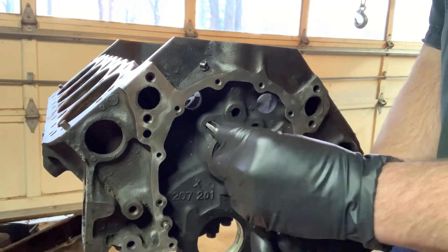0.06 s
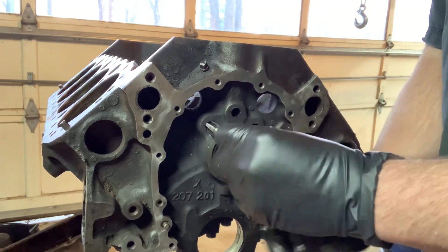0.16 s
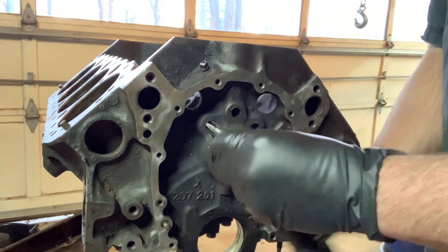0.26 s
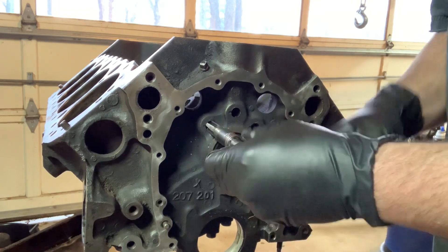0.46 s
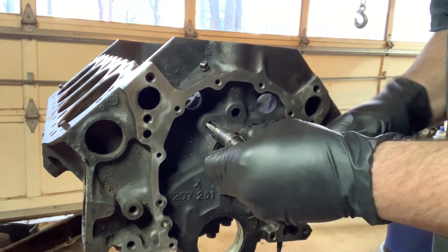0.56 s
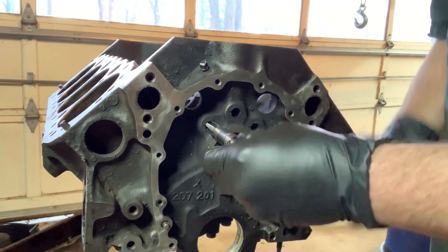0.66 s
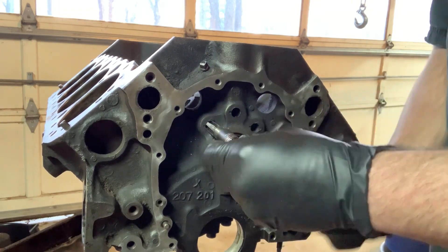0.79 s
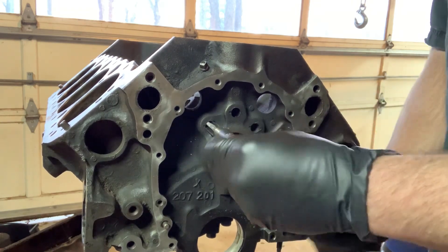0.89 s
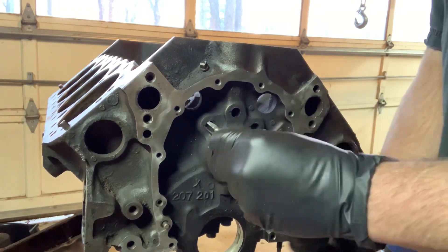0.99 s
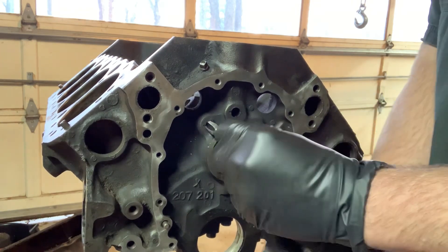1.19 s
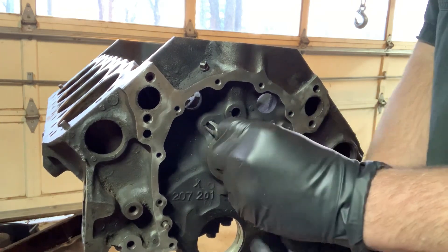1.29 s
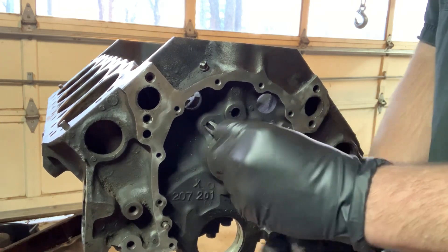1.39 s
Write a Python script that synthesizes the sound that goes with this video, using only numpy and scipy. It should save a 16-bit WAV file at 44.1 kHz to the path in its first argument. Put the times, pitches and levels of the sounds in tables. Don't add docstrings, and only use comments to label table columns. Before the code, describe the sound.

Fast bright metallic ratchet clicking, about fourteen teeth, then faint handling knocks in a quiet workshop

```python
import sys
import numpy as np
from scipy import signal
from scipy.fft import rfft, irfft, next_fast_len
from scipy.io import wavfile

SR = 44100
rng = np.random.default_rng(int(sys.argv[2]) if len(sys.argv) > 2 else 0)


def attenuation_scalar(level_db):
    decades = np.asarray(level_db, float) / 20
    return 10 ** decades


def output_pcm(signal):
    pcm = np.clip(np.atleast_2d(signal).T, -1, 1) * 32767
    wavfile.write(sys.argv[1], SR, np.round(pcm).astype(np.int16))


N = 63945

# (time [s], crack level [dB], thud level [dB], low bar mode level [dB], high bar mode level [dB])
PAWL_DROPS = [(0.23, -30.5, -42.5, -40.5, -36), (0.2534, -30.5, -46.5, -45, -36.5),
              (0.2723, -30, -39, -47, -34), (0.2897, -30.5, -39, -48, -30.5),
              (0.3062, -32, -50.5, -48, -51.5), (0.322, -28.5, -46, -52, -42),
              (0.3383, -29.5, -47.5, -46, -41.5), (0.3546, -25.5, -49.5, -52, -50),
              (0.374, -29.5, -42, -54.5, -34), (.3930, -29.5, -49, -48.5, -39),
              (0.4122, -27, -43, -46.5, -36), (0.4308, -27, -39.5, -44.5, -31.5),
              (0.458, -29.5, -40.5, -45.5, -50), (0.4967, -29, -40, -48, -44.5)]
DROP_THUD_HZ = [1600, 1720, 1650, 1780, 2200, 2260, 2000, 1780, 2050, 1990, 1360, 2870, 1920, 3000]
# (rise [s], ring length [share of usual], beat phase [rad], thud spacing [s])
DROP_RING = [(0.0031, 0.31, 1.1, .0013), (.001, 0.56, 0.084, 0.0012), (.001, 1.3, 1, .0012),
             (0.0015, 1, 0, .0013), (0.00048, 1., 1.5, 0.0019), (.001, 0.49, 0.17, .001),
             (.001, .8, 1.8, 0.0017), (.001, 1.1, 2.3, 0.0015), (.001, 0.7, 0.23, .001),
             (.002, 1., 0.26, 0.0011), (.002, 0.64, 0, .001), (0.0022, 0.58, 1.2, 0.00074),
             (0.00071, 0.53, 2.5, 0.0019), (0.0015, 0.56, 2., .0013)]
# (frequency [Hz], level [dB per Hz])
CRACK_COLOUR = [(700, -29), (1500, -13.5), (3000, -6), (6000, -7.5), (8000, 3.5), (10500, 0), (13000, -9.5),
                (16000, -18)]
# (frequency [Hz], level [dB], T60 [s])
HEAD_MODES = [(1387, -5.5, 0.018), (1647, -1.5, 0.011), (2200, 5.5, 0.0096), (2700, -0.5, 0.012),
              (3100, 1.5, 0.016), (3460, -1, 0.016), (6000, 0.5, 0.0061)]
# (frequency [Hz], level [dB], T60 [s])
LOW_BAR_MODES = [(4538, -12.5, .06), (4584, 2.5, 0.12), (4740, -14, 0.062), (4540, -6.5, 0.18)]
# (frequency [Hz], level [dB], T60 [s])
HIGH_BAR_MODES = [(9358, -10, 0.058), (9453, 4.5, 0.047), (9443, -9.5, 0.16), (9415, -13.5, .04),
                  (10500, -13, .02), (9870, -7.5, .02), (7500, -33, .05)]
# (frequency [Hz], level [dB], T60 [s])
TOP_BAR_MODES = [(15380, -17, .03), (15140, -22, .03)]
# (time [s], level [dB], centre [Hz], top [Hz], room send [dB])
KNOCKS = [(0.03, -66.5, 1310, 6240, 3), (.182, -59.5, 1001, 2500, 5.5), (0.195, -47.5, 2400, 6160, 1),
          (.415, -56.5, 920, 1520, -12), (.425, -60, 221, 356, 1.5), (.76, -72.5, 333, 600, 9.5),
          (0.759, -58, 1800, 4880, 6.5), (0.599, -72.5, 1500, 3000, 4), (.855, -70.5, 1800, 3520, -0.5),
          (0.949, -60, 1790, 4450, 5.5), (0.953, -70, 302, 870, 10), (1.003, -67, 1190, 2500, -6),
          (1.3247, -53, 1224, 2510, 11), (1.329, -54.5, 2200, 3350, 9), (1.335, -64, 255, 503, 4),
          (.235, -69, 260, 350, 6), (1.387, -63.5, 200, 350, 2)]
# (frequency [Hz], level [dB], T60 [s])
BLOCK_MODES = [(252, -22.5, 0.24), (643, 2, 0.044), (794.2, -4.5, 0.26), (910, -4.5, 0.2), (920, -1, 0.27),
               (1046, 0.5, 0.15), (1142, 4, 0.045), (1406, 0, 0.055), (1910, -6.5, 0.13)]
# (time
# [s], level [dB], frequency [Hz], T60 [s], rise [s])
RINGING_TONES = [(.045, -63.5, 449, 0.077, 0.0062), (.272, -47, 1720, 0.022, 0.00087),
                 (0.43, -37, 2650, .03, 0.00058), (0.429, -46, 3100, 0.034, .0007),
                 (.4965, -43, 3280, 0.032, 0.00061), (.4965, -42.5, 2218, .05, 0.00052),
                 (.50, -60.5, 2265, 0.28, .005), (.505, -71, 3510, 0.29, .005), (0.508, -72, 2720, 0.43, .01),
                 (.52, -71, 1954, 0.44, 0.011), (.688, -70, 279.5, 0.057, 0.0037),
                 (.778, -66.5, 216, .12, 0.0051), (.952, -63, 209.4, 0.086, .004),
                 (.615, -72.5, 800, 0.33, .01), (0.761, -63, 1048, .15, .003), (.762, -70, 2300, .08, 0.0012),
                 (.78, -74, 2540, 0.094, .004), (.832, -68.5, 793, .25, 0.0071),
                 (.62, -76.5, 1230, 0.28, .01), (0.948, -68, 1050, 0.14, 0.0022),
                 (.948, -61, 1752, 0.043, 0.0019), (0.954, -75, 481, 0.22, .004),
                 (.962, -64.5, 803, 0.29, 0.0071), (1.0, -73, 795, 0.24, .008),
                 (1.002, -67.5, 1196, 0.14, 0.0031), (1.006, -72, 433, 0.09, 0.0031),
                 (1.3251, -38.5, 1173, .011, 0.00069), (1.33, -52.5, 630, 0.12, .003),
                 (1.354, -57, 1124, 0.17, 0.0058), (1.4244, -54.5, 1500, 0.018, 0.00061),
                 (1.4248, -60.5, 4600, .012, 0.00048), (1.425, -51.5, 2243, 0.018, 0.00073)]
# (time [s], level [dB], frequency [Hz], T60 [s])
TICKS = [
    (0.138, -64, 1850, 0.011),
    (0.674, -68.5, 10900, 0.0061),
    (0.6893, -56, 1600, 0.019),
    (1.114, -76.5, 1443, 0.017),
    (1.249, -62, 4300, 0.0089),
    (1.423, -54, 2690, 0.011),
    (1.446, -61.5, 4730, 0.06),
]
# (start [s], length [s], level [dB])
GLOVE_RUBS = [
    (0.0, 0.066, -67.5),
    (0.169, 0.38, -55),
    (0.572, 0.063, -68),
    (0.647, 0.081, -74.5),
    (1.195, 0.08, -73),
    (1.287, 0.082, -74),
    (1.385, 0.09, -68),
]
# (frequency [Hz], level [dB per Hz])
GLOVE_COLOUR = [(300, -10), (800, -9), (1400, -1), (3000, -3.5), (6000, -12), (12000, -24)]
# (frequency [Hz], T60 [s])
ROOM_T60 = [(200, 0.34), (1000, 0.4), (3000, 0.23), (8000, 0.26), (12000, 0.19), (15500, 0.071)]
# (frequency [Hz], level [dB per Hz])
FLOOR_COLOUR = [(30, -13), (60, 3.5), (120, 0.5), (170, -5.5), (500, -20), (2000, -26.5), (6000, -30),
                (14200, -31), (14800, -55.5)]
# (frequency [Hz], level [dB])
HUM_LINES = [(60, -79), (92, -76.5), (118, -73.5), (240, -88)]
# (frequency [Hz], left-right phase [rad])
PORT_TURN = [(100, .05), (1000, .6), (4600, 1.5), (7500, 3.0), (8900, 3.3), (11300, 6.0), (14400, 6.5),
             (15400, 8.4)]
# (frequency [Hz], level [dB])
APART = [(60, -3), (300, -4.5), (700, 3), (2500, 0), (4600, 0), (6300, -1), (7300, -5.5), (7800, -24.5),
         (10000, -10), (15000, -22)]
# (frequency [Hz], left over right [dB])
LEFT_RIGHT = [(60, -3), (180, -5), (550, 1), (1650, 0.5), (4970, 0), (15000, 2.5)]


def at_hz(points, hz):
    curve_hz, value = np.array(points).T
    return np.interp(np.log(hz + 1), np.log(curve_hz), value)


def rms_one(x):
    return x / np.sqrt(np.mean(x ** 2) + 1e-20)


def sos_filter(x, order, hz, kind="low"):
    return signal.sosfilt(signal.butter(order, hz, kind, fs=SR, output="sos"), x)


def colour(x, spectrum):
    size = x.shape[-1]
    return irfft(rfft(x) * attenuation_scalar(at_hz(spectrum, np.fft.rfftfreq(size, 1 / SR))), size)


def clicks(s, gain):
    out = np.full(N, 1e-18)
    places = np.clip((np.asarray(s) * SR).astype(int), 0, N - 1)
    np.add.at(out, places, gain)
    return out


def ring(x, hz, t60):
    r, w = attenuation_scalar(-60 / (t60 * SR)), 2 * np.pi * hz / SR
    return signal.lfilter([0, np.sin(w)], [1, -2 * r * np.cos(w), r * r], x)


def decay(x, t60):
    return signal.lfilter([1], [1, -attenuation_scalar(-60 / (t60 * SR))], x)


def ratchet():
    bounce_s, bounce_loss_db, thud_loss_db, spread_db = 0.0011, 3.5, 6, 1.5
    crack_t60_s, crack_db, thud_db = 0.0059, 4, 0.5
    octave_loss_db = 18.0
    s, crack, thud = np.transpose(PAWL_DROPS)[:3, :, None]
    k = np.arange(4)
    shape = (len(s), 4)

    when = s + bounce_s * k * rng.uniform(0.43, 1.4, shape)
    uneven = spread_db * rng.standard_normal(shape)
    size = attenuation_scalar(crack + crack_db - bounce_loss_db * k + uneven)
    out = decay(clicks(when.ravel(), size.ravel()), crack_t60_s)
    out = colour(out * rng.choice([-1, 1], N), CRACK_COLOUR)

    later = (s + 0.0006 + np.array(DROP_RING)[:, 3:] * k).ravel()
    for hz, mode_db, t60 in HEAD_MODES:
        away = octave_loss_db * np.abs(np.log2(hz / np.array(DROP_THUD_HZ)))[:, None]
        uneven = spread_db * rng.standard_normal(shape)
        size = attenuation_scalar(thud + thud_db + mode_db - away - thud_loss_db * k + uneven)
        out += ring(clicks(later, size.ravel()), hz, t60)
    return sos_filter(out, 4, 1200, "high")


def bar():
    bar_db, high_bar_db = 8, -2
    flutter_db, flutter_hz = 2.5, 89.4
    swing_rad = 0.63
    s, crack, _, low, high = np.transpose(PAWL_DROPS)
    rise, length, beat, _ = np.transpose(DROP_RING)
    t, out = np.arange(N) / SR, 0
    last = np.clip(np.searchsorted(s, t) - 1, 0, None)
    since = np.maximum(t - s[last], 0)
    attack = 1 - np.exp(-since / rise[last])
    swing = (swing_rad * rng.uniform(-1.2, 1, len(s)) * [[1], [-1]])[:, last]
    groups = (
        (LOW_BAR_MODES, low, swing, beat[last]),
        (HIGH_BAR_MODES, high + high_bar_db, 0, 0),
        (TOP_BAR_MODES, crack, 0, 0),
    )
    for modes, db, turn, offset in groups:
        flutter = flutter_db * rms_one(sos_filter(rng.standard_normal(N), 2, flutter_hz))
        for k, (hz, mode_db, t60) in enumerate(modes):
            fall = 60 * since / (t60 * length[last])
            level = db[last] + bar_db + mode_db - fall + flutter
            out = out + attenuation_scalar(level) * attack * np.sin(2 * np.pi * hz * since + turn + k * offset)
    return sos_filter(out, 2, 3000, "high")


def knocks():
    half_width_octaves, block_db = 0.91, -10
    direct, send = np.zeros(N), np.zeros(N)
    for s, db, hz, top_hz, room_db in KNOCKS:
        edges = hz * 2 ** (half_width_octaves * np.array([-1., 1.]))
        burst = sos_filter(clicks([s], 0.88), 2, edges, "band")
        burst = sos_filter(burst, 3, top_hz)
        burst *= attenuation_scalar(db) / np.abs(burst).max()
        direct += burst
        send += burst * attenuation_scalar(room_db + 15)
    body = 0
    for hz, db, t60 in BLOCK_MODES:
        body = body + attenuation_scalar(block_db + db) * hz / SR * 3.8 * ring(direct, hz, t60)
    return direct + body, send + body


def ringing_tones():
    t, out = np.arange(N) / SR, 0
    for s, db, hz, t60, rise in RINGING_TONES:
        since = np.maximum(t - s, 0)
        pair = np.sin(2 * np.pi * hz * since) + 0.4 * np.sin(2 * np.pi * hz * 1.035 * since)
        out = out + attenuation_scalar(db - 60 * since / t60) * (1 - np.exp(-since / rise)) * pair
    return out


def ticks():
    out = 0
    for s, db, hz, t60 in TICKS:
        tap = clicks([s], 1.)
        pair = ring(tap, hz, t60) + 0.7 * ring(tap, hz * 1.17, t60)
        out = out + attenuation_scalar(db) * sos_filter(pair, 2, [hz / 1.3, hz * 1.5], "band")
    return out


def glove():
    t, stroke = np.arange(N) / SR, 0
    for s, length, db in GLOVE_RUBS:
        stroke = stroke + attenuation_scalar(db) * np.sin(np.pi * np.clip((t - s) / length, 0, 1))
    grains = rng.standard_normal((2, N)) * attenuation_scalar(1.1 * np.minimum(rng.exponential(1, N), 5))
    return stroke * rms_one(colour(grains, GLOVE_COLOUR))


def scatter(x):
    level_db, t60 = -1, 0.036
    t = np.arange(SR // 20) / SR
    cloud = rng.standard_normal((2, len(t))) * attenuation_scalar(-60 * t / t60) * np.sqrt(14 / t60 / SR)
    return attenuation_scalar(level_db) * signal.fftconvolve(x[None], cloud, axes=1)[:, :N]


def room(x):
    level_db, delay_s, build_s = -8.5, 0.0028, 0.0026
    t, tail = np.arange(SR // 2) / SR, 0
    for hz in 180 * 2. ** np.arange(0, 7, .5):
        edges = [hz / 1.19, min(hz * 1.19, .48 * SR)]
        t60 = at_hz(ROOM_T60, hz)
        band = sos_filter(rng.standard_normal((2, len(t))), 2, edges, "band")
        tail = tail + band * attenuation_scalar(-60 * t / t60) * np.sqrt(14 / t60 / SR)
    tail = tail * np.clip((t - delay_s) / build_s, 0, 1)
    return attenuation_scalar(level_db) * signal.fftconvolve(x[None], tail, axes=1)[:, :N]


def floor():
    out = attenuation_scalar(-69) * rms_one(colour(rng.standard_normal((2, N)), FLOOR_COLOUR))
    for hz, db in HUM_LINES:
        line = ring(rng.standard_normal(N + SR), hz, 0.3)[SR:]
        out += attenuation_scalar(db) * rms_one(line)
    return out


def scene():
    pawl, steel, taps, tones = ratchet(), bar(), ticks(), ringing_tones()
    direct, send = knocks()
    steel_mono = steel.mean(axis=0)
    echoes = scatter(pawl + direct + attenuation_scalar(-11.5) * steel_mono)
    wet = pawl + attenuation_scalar(3.5) * steel_mono + send + attenuation_scalar(2.0) * taps + attenuation_scalar(-8) * tones
    near = pawl + steel + taps + tones + direct
    return near + echoes + np.sqrt(2) * room(wet) + glove() + floor()


def roll_off(x):
    return signal.sosfilt(signal.butter(12, 16810, fs=SR, output="sos"), x)


def record(dry):
    cutoff_hz = 16750
    size = next_fast_len(N + 4096)
    hz = np.fft.rfftfreq(size, 1 / SR)
    left, right = rfft(dry, size)
    shared = (left + right) / 2
    apart = (left - right) / 2 * attenuation_scalar(at_hz(APART, hz))
    turn = np.exp(.5j * at_hz(PORT_TURN, hz)) * attenuation_scalar(at_hz(LEFT_RIGHT, hz) / 2)
    pair = irfft(np.array([(shared + apart) * turn, (shared - apart) / turn]), size)[:, :N]
    steep = signal.cheby2(12, 70, cutoff_hz + 400, fs=SR, output="sos")
    return roll_off(signal.sosfilt(steep, pair))


dry = scene()
out = record(dry)
output_pcm(out)
```